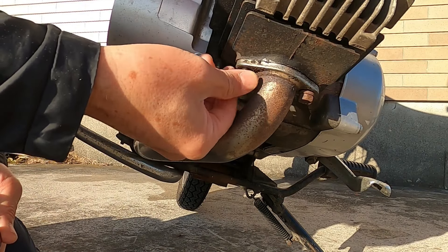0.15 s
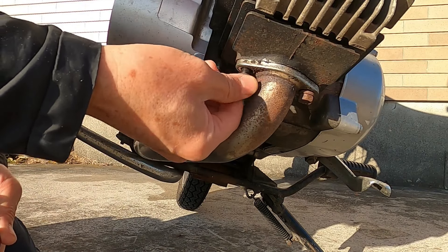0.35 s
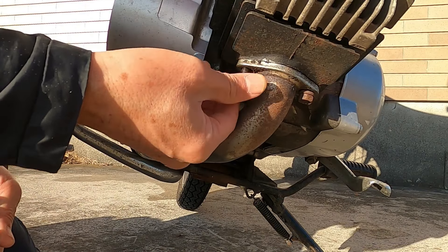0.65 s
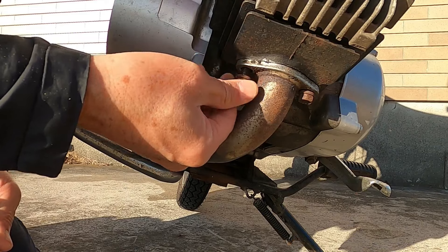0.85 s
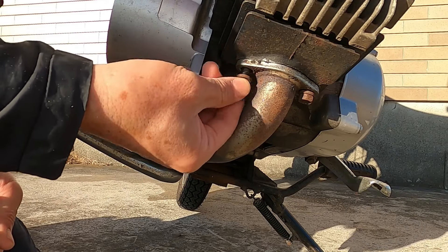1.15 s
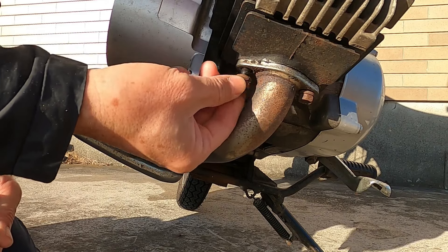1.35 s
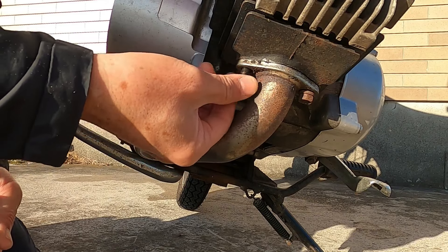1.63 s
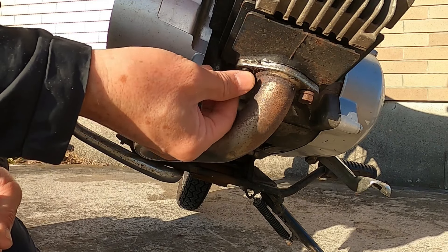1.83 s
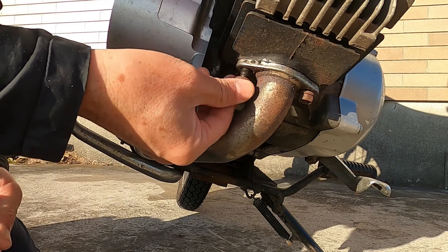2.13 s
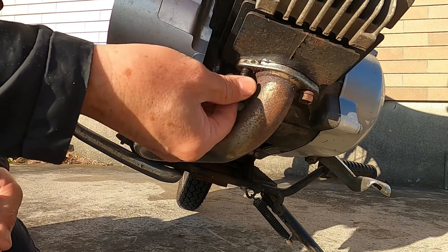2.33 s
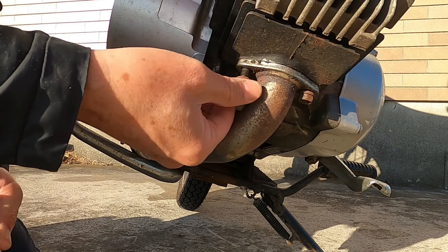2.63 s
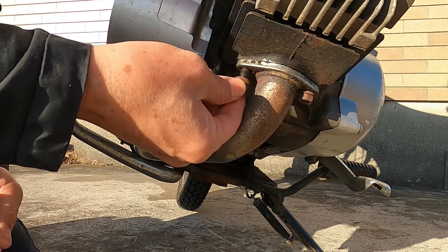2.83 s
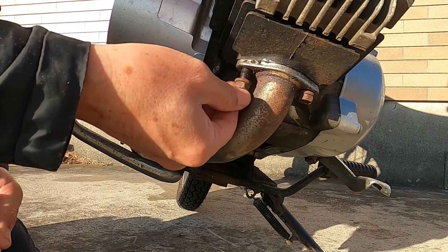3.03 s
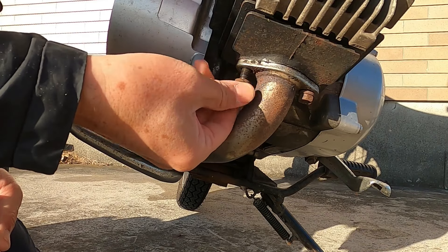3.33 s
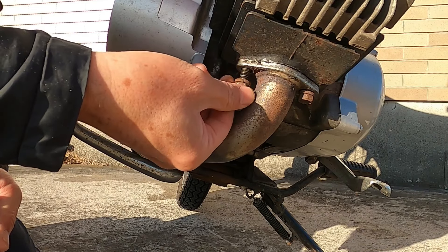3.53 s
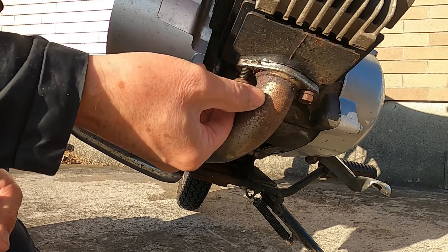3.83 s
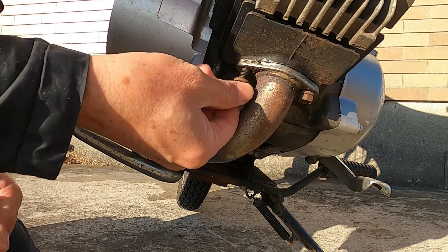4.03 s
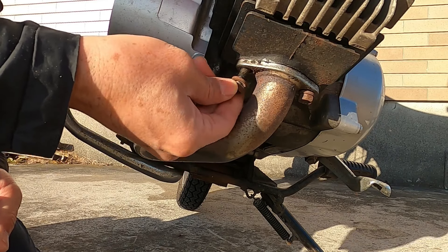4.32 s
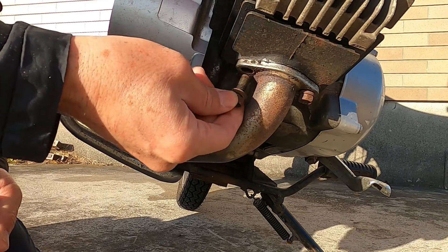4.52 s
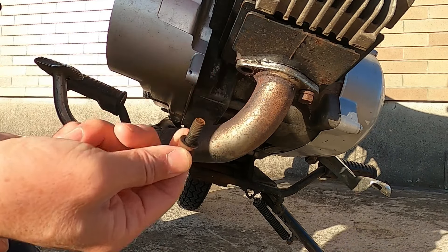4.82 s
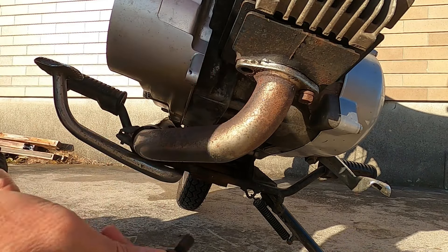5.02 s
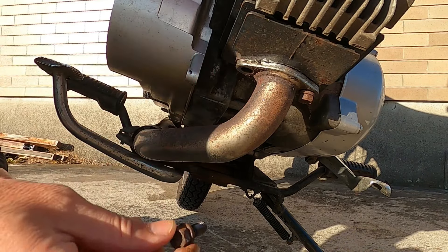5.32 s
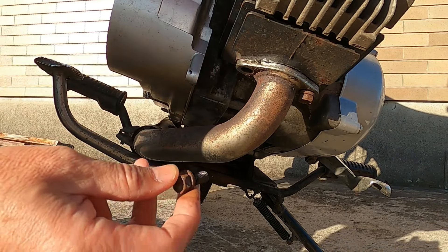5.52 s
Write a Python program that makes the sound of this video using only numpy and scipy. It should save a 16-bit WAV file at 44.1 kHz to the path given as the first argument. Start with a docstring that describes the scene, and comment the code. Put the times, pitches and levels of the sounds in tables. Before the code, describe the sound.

Close to the microphones, fingers turn a nut on an engine stud in short irregular twists, giving dry gritty rasps and faint metallic ticks. The sound is wide and smeared at first, then suddenly crisper, with bright clinks and one strongest knock near the end of the unscrewing. A nylon sleeve swishes as the hand withdraws. Outdoors, low wind thumps and a smooth distant town murmur continue.

```python
"""Loose nut on a small engine

Fingers spin a nut off a stud: scrapes, drag and blows of the thread excite resonances of finned iron.
Beside the ring lies a dry rasp of skin and rust. A nylon sleeve then swishes as shaped, gritty noise.
Light wind thumps the microphones as low noise in gusts, over the smooth noise of a distant town.
Until 3.33 s the stereo image is wide and blurred, its phase wandering; microphone hiss lies over all."""
import sys
import numpy as np
from scipy import signal
from scipy.fft import rfft, irfft, next_fast_len
from scipy.io import wavfile
from scipy.ndimage import uniform_filter1d

SR = 44100
rng = np.random.default_rng(int(sys.argv[2]) if len(sys.argv) > 2 else 0)


def wav_record(signal):
    """Record a signal, one row per channel, as 16-bit PCM in the file named by sys.argv[1]."""
    frames = np.transpose(np.atleast_2d(signal))
    bounded = np.clip(frames, -1, 1)
    # unit amplitude maps onto the largest positive 16-bit level
    quanta = np.round(bounded * 32767).astype(np.int16)
    wavfile.write(sys.argv[1], SR, quanta)


def invert_db(x):
    """Field ratio 10**(x/20) for x, a level in decibels (scalar or array-like)."""
    u = np.asarray(x, float) / 20
    return 10 ** u


N = 249769  # samples
PADDED = next_fast_len(N, True)  # transform length, samples
NUT_OFF_S = 4.69
BLUR_UNTIL_S = 3.33


def nut():
    """Source and resonator: contact forces of the thread drive the modes of the iron."""
    turning = drag()
    dry_rasp = rasp(turning)
    force = (scrapes() + turning) * grit(1.54) + blows()
    return dry_rasp + radiate(iron_ring(force))


# Thread scrapes: middle t/s, push level/dB, brightness/dB, side-on level/dB, length/s (at half height)
SCRAPES = [(0.02, -55, -1, -5, 0.006), (0.03, -44, 2, -20, 0.024), (0.0725, -51, 1, -11, 0.004),
           (0.1275, -44.5, -17, -26, 0.0073), (0.1666, -45, 3.5, -19, 0.014),
           (0.183, -44.5, -7, -20, 0.015), (0.212, -61, -1, -9, 0.02), (0.267, -34, -9.5, -13, 0.011),
           (0.3175, -42, 0.5, -6, 0.02), (0.337, -51, 12, -7, 0.012), (0.487, -50.5, 8.5, 5, 0.0075),
           (0.517, -49, -5, -4, 0.017), (0.5412, -56, 15, 9, 0.007), (0.659, -54, 1, 0, 0.025),
           (0.7373, -43, -6.5, -3, 0.01), (0.776, -48, 6.5, 2, 0.0059), (0.8413, -49, -7, -5, 0.012),
           (0.853, -50, -9, -10, 0.0093), (0.871, -46.5, -21, -28, 0.012), (0.887, -50, -22, -20, 0.017),
           (0.9045, -56, -10, -33, 0.02), (0.9253, -45, -13, -5, 0.0045), (1.068, -46, 2, 0.5, 0.03),
           (1.143, -51.5, -17, -10, 0.0077), (1.159, -58, -6, -18, 0.015), (1.185, -56.5, -8, -11, 0.0089),
           (1.2543, -44, -3, -19, 0.016), (1.4552, -37.5, -18, -18, 0.004),
           (1.5133, -49.5, 5.5, -7, 0.0084), (1.617, -49.5, -2, -12, 0.017), (1.642, -53.5, -1, -4, 0.014),
           (1.687, -56, -10, -9, 0.0097), (1.749, -50, -16, -25, 0.0048), (1.7998, -43.5, -5, 1, 0.024),
           (1.863, -56.5, -5, -1, 0.0092), (1.922, -49, -17, -13, 0.0059), (1.957, -63, 1, 5, 0.0081),
           (1.9705, -54.5, 11, 1, 0.02), (2.033, -57.5, -4.5, -2, 0.0093), (2.045, -54, -13, -15, 0.0067),
           (2.082, -51, -11, -1, 0.0085), (2.133, -49, -3.5, -6, 0.019), (2.1947, -55, 2.5, 0, 0.0099),
           (2.264, -45.5, -14, -19, 0.018), (2.3089, -47, 3.5, -5, 0.012), (2.375, -57.5, 4.5, 2, 0.0068),
           (2.423, -49, -10, -6, 0.0097), (2.476, -53, 5.5, 5, 0.02), (2.491, -54.5, 6, -4, 0.026),
           (2.525, -55, -12, -9, 0.033), (2.6832, -33.5, -5, -14, 0.007), (2.773, -57, -12, 0, 0.024),
           (2.853, -43.5, 10.5, 6.5, 0.0091), (2.887, -64.5, 13, -11, 0.012),
           (3.336, -51.5, -21, -27, 0.013), (3.36, -55.5, -25, -15, 0.032), (3.414, -64, 2, -18, 0.035),
           (3.439, -59, 0, -16, 0.0067), (3.463, -56, 2, -5, 0.0138), (3.478, -42, -27, -4, 0.0071),
           (3.504, -45, 5, -10, 0.0048), (3.5266, -48, -15, -3, 0.009), (3.606, -50, -1, 1.5, 0.0037),
           (3.651, -52, -10, -1, 0.0082), (3.79, -60.5, 1, 8.5, 0.031), (3.825, -58.5, 1, 8, 0.026),
           (3.8624, -52.5, -3, -4, 0.025), (3.93, -45.5, -8, -13, 0.0056), (4.078, -55.5, -26, -20, 0.022),
           (4.108, -56, -4, -9, 0.011), (4.134, -54, -7.5, -7, 0.013), (4.2105, -72.5, 9, -19, 0.019),
           (4.265, -42, -1, -18, 0.005), (4.289, -50, -7, -18, 0.014), (4.303, -47, -15.5, -21, 0.024),
           (4.484, -29, -44, -10, 0.0036), (4.528, -50, -15, -2, 0.0045), (4.603, -56, -17, -12, 0.025)]


def scrapes():
    """Brief friction: the force on each of four ring groups swells and dies, raggedly."""
    push = np.zeros((4, N))
    for middle, db, bright_db, side_db, length in SCRAPES:
        count = int(length * SR)
        start = int(middle * SR) - count
        # a shorter scrape pushes harder for the same ring
        shape = np.hanning(2 * count) * np.sqrt(1 + 0.0079 * SR / count)
        push[:, start:start + 2 * count] += ring_groups(db, bright_db, side_db)[:, None] * shape
    return push * walk(250, 2.8)


# Finger twists: start t/s, length/s, drag level/dB, brightness/dB (top ring group against the drag)
TWISTS = [(0.0, 0.088, -51.5, -6.5), (0.131, 0.12, -61.5, 1.5), (0.262, 0.067, -63.5, 4.5),
          (0.378, 0.027, -67, 12), (0.44, 0.11, -56, -11), (0.645, 0.06, -66.5, 5), (0.72, 0.094, -62, -1),
          (0.823, 0.13, -65, 5), (1.008, 0.13, -63.5, 2), (1.245, 0.086, -57.5, -6.5),
          (1.423, 0.054, -46, -6.5), (1.497, 0.068, -70, 3), (1.606, 0.11, -68, 6.5),
          (1.743, 0.16, -63.5, 1.5), (1.912, 0.13, -56, -6.5), (2.108, 0.11, -50, -6.5),
          (2.248, 0.09, -62.5, 5.5), (2.373, 0.021, -66.5, 9.5), (2.435, 0.11, -57, 0),
          (2.586, 0.085, -58, -8), (2.661, 0.11, -64, -2), (2.954, 0.12, -62, -6), (3.147, 0.052, -61, -6),
          (3.215, 0.024, -68, 14.5), (3.352, 0.1, -53, -1.5), (3.417, 0.12, -58, 0.5),
          (3.57, 0.12, -58.5, -24), (3.73, 0.21, -59, 0), (3.909, 0.076, -52, -8.5),
          (4.044, 0.11, -59.5, -0.5), (4.196, 0.028, -67.5, 9), (4.25, 0.095, -55.5, -10.5),
          (4.402, 0.06, -59, -2), (4.46, 0.103, -53.5, -9), (4.576, 0.088, -55.5, -8.5)]


def drag():
    """Stick-slip friction: the thread catches and slips at random through each twist."""
    rise_s, fall_s = 0.025, 0.023
    resting_db = -82.5  # fingers stay on the nut between twists
    push = invert_db(resting_db) * (np.arange(N) < NUT_OFF_S * SR)
    for start, length, db, bright_db in TWISTS:
        groups_db = db + np.array([-9, -16.5, -8.5, bright_db])
        push = push + invert_db(groups_db)[:, None] * stroke(start, length, rise_s, fall_s)
    return push * walk(70, 3.7)


# Clean metal blows, the nut dropping against the stud: t/s, push level/dB, brightness/dB, side-on level/dB
BLOWS = [(3.4755, -16, -4, -1), (3.5027, -20, 7, -3), (3.589, -26, -7, -3), (3.6494, -20.5, -9, -2),
         (3.9235, -15, -4, -13), (4.2605, -17.5, -2, -15), (4.476, -17.5, 3.5, -17), (4.4776, 3, -45, -32)]


def blows():
    """Impulse excitation: each blow is a push one sample long."""
    push = np.zeros((4, N))
    for s, db, bright_db, side_db in BLOWS:
        push[:, int(s * SR)] = ring_groups(db, bright_db, side_db)
    return push


def ring_groups(db, bright_db, side_db):
    """Modal excitation: the way of contact sets how hard each of the four ring groups is pushed."""
    third_db = 1.6 + 0.89 * bright_db
    fourth_db = 0.5 + 0.91 * bright_db
    return invert_db(db + np.array([0, side_db, third_db, fourth_db]))


# Modes of the iron, the short ones being the dense cooling-fin modes: f/Hz, level/dB, decay by 60 dB t/s
IRON = [(1457, -17.5, 0.11), (1827, -23.5, 0.11), (2101, 0.5, 0.08), (2140, -19.5, 0.072),
        (2236, -9.5, 0.057), (2334, -7.5, 0.11), (2684.4, 0, 0.11), (3030, -9, 0.0025), (2720, -29, 0.24),
        (3280, -11.5, 0.073), (3299, -10, 0.073), (3377, -3.5, 0.04), (3783, -7.5, 0.072),
        (3526, -7.5, 0.064), (3796, -10.5, 0.093), (4296, -7, 0.01), (4479, -5.5, 0.017),
        (4860, -13.5, 0.068), (5150, -16, 0.07), (5900, -21, 0.18), (5470, -10, 0.0034), (6100, -20, 0.068),
        (6210, -20, 0.05), (6610, -17.5, 0.024), (6770, -20, 0.0055), (7130, -18, 0.08),
        (7350, -38.5, 0.19), (8300, -16, 0.036), (9600, -40, .03)]
# Limits of the four ring groups: f/Hz
RING_EDGES_HZ = (1250, 2500, 2850, 3850, 12000)


def iron_ring(force):
    """Modal superposition: each mode, driven by its group's force, comes and goes as the contact wanders."""
    # each group mainly takes up the push near its own pitch
    for group, edges in enumerate(zip(RING_EDGES_HZ, RING_EDGES_HZ[1:])):
        b, a = signal.butter(N=1, Wn=edges, btype="band", fs=SR)
        force[group] = signal.lfilter(b, a, force[group])
    ring = np.zeros(N)
    split = int(BLUR_UNTIL_S * SR)
    for hz, db, t60 in IRON:
        group = np.searchsorted(RING_EDGES_HZ, hz) - 1
        drive = force[group] * walk(24.675, 2.0)
        # ringing stops at the split and starts afresh
        ring += np.r_[mode(drive[:split], hz, db, t60), mode(drive[split:], hz, db, t60)]
    return ring


def mode(drive, hz, db, t60):
    """Damped resonance: a two-pole filter, with db its rms level under steady white drive of rms 1."""
    pole = np.exp(2j * np.pi * hz / SR - np.log(1000) / (t60 * SR))
    gain = invert_db(db) * np.sqrt(2 * (1 - abs(pole) ** 2))
    return signal.lfilter([0, gain * pole.imag], [1, -2 * pole.real, abs(pole) ** 2], drive)


# How the engine block and microphones pass the ring on: f/Hz, level/dB
RADIATE = [(700, -6), (1300, -3.5), (1450, -4), (1720, -14), (1820, -5), (7300, -2), (8500, -15),
           (11000, -15), (15500, -22)]


def radiate(ring):
    """Radiation and path difference: the left microphone is a little further off and shaded in treble."""
    hz = np.fft.rfftfreq(PADDED, 1 / SR)
    delay_s = 0.00005
    left = invert_db(0.17 - hz / 1700) * np.exp(-2j * np.pi * hz * delay_s)
    ears = np.array([left, np.ones_like(hz)])
    return irfft(rfft(ring, PADDED) * invert_db(over_hz(RADIATE)) * ears, PADDED)[:, :N]


# Spectrum of the dry rasp of skin and rust: f/Hz, level/dB
RASP = [(1200, -24), (2500, -6.5), (4500, -2.5), (7200, -4), (8800, -14.5), (12000, -24.5), (15500, -37)]


def rasp(turning):
    """Friction noise: coloured noise follows the drag on the highest ring group."""
    level = invert_db(-10 + np.array([[-1.5], [1.5]]))  # left, right
    return colour(pair(0.4), RASP) * turning[-1] * level


# Sleeve strokes: start t/s, length/s, level/dB, swell/s, fade/s
SLEEVE = [(4.606, 0.1, -61, 0.033, 0.068), (4.74, 0.27, -51, 0.1, 0.31), (5.1, 0.18, -53.5, 0.12, 0.05),
          (5.316, 0.062, -57, 0.048, 0.03), (5.514, 0.081, -58, 0.13, 0.03)]
# Spectrum of rubbed nylon: f/Hz, level/dB
NYLON = [(1200, -13.5), (1900, -9.5), (3000, -6.5), (4600, -4), (6000, -9), (7300, -13.5), (9300, -31),
         (14000, -45.5)]


def sleeve():
    """Friction of rough surfaces: woven nylon slides on itself, a dense fine grit spread wide."""
    noise = pair(0.24)
    uneven = invert_db(1.8 * rng.exponential(size=N))
    rub = colour(noise * uneven, NYLON)
    level = invert_db(-65.5) * (np.arange(N) > NUT_OFF_S * SR)  # faint rub between strokes
    for start, length, db, swell, fade in SLEEVE:
        level = level + invert_db(db) * stroke(start, length, swell, fade)
    pan = invert_db(np.array([[2], [-2]]))  # left, right
    return rub * level * pan * walk(24, 0.94)


# Gusts on the microphones: t/s, rumble level/dB
GUSTS = [(0.0, -72), (0.05, -58.5), (0.31, -42), (0.38, -53), (0.63, -49.5), (0.71, -51), (0.91, -43),
         (1.06, -47), (1.58, -56), (1.67, -88), (1.84, -52), (2.16, -56.5), (2.22, -69), (2.33, -48),
         (2.4, -57), (2.73, -49.5), (2.81, -64), (3.58, -53), (3.66, -90.5), (3.7, -53), (4.46, -45),
         (4.49, -68), (4.56, -42.5), (4.78, -69), (4.82, -49), (4.92, -59.5), (5.09, -48), (5.25, -67.5),
         (5.31, -57), (5.66, -64.5)]
# Breeze under the gusts, freshening later on; lifts buffets and flutter: t/s, level/dB
BREEZE = [(0.0, 2), (0.6, 2.5), (1.5, 1.5), (2.3, 1), (3.2, 1.5), (3.45, 5.5), (4.3, 8), (5.0, 5.5),
          (5.66, 7)]
# Spectra of the three wind layers: f/Hz, level/dB
RUMBLE = [(9, -12), (15, 5), (45, 9.5), (62, -12.5), (100, -18), (300, -65), (900, -130)]
BUFFET = [(30, -28), (55, 2), (80, -6.5), (105, -5), (200, -46.5), (800, -130)]
FLUTTER = [(60, -24), (105, -2.5), (135, 10), (200, 0.5), (300, -19), (1200, -130)]


def wind():
    """Turbulent pressure: eddies thump the microphone ports; quicker buffets and flutter ride above."""
    gust_db, breeze_db = curve(GUSTS), curve(BREEZE)
    swing_db = gust_db - gust_db.mean()
    # the higher layers follow only a share of each gust
    buffet_db = -66 + 0.3 * swing_db + breeze_db
    flutter_db = -66.5 + 0.092 * swing_db + breeze_db
    gusts = wind_layer(gust_db, RUMBLE, 10, 2.2)
    gusts = gusts + wind_layer(buffet_db, BUFFET, 14, 3.8)
    gusts = gusts + wind_layer(flutter_db, FLUTTER, 20, 3.1)
    return gusts * invert_db(np.array([[0.6], [2.4]]))  # left, right


def wind_layer(level_db, tone, rate, spread_db):
    """Band of turbulence: coloured noise, nearly alike left and right, with a wandering level."""
    return colour(pair(0.95), tone) * invert_db(level_db) * walk(rate, spread_db)


# Distant town: t/s, level/dB
TOWN = [(0.0, -59), (0.91, -60.5), (1.83, -60.5), (2.36, -59.5), (2.92, -61), (3.18, -60.5), (3.56, -57),
        (4.29, -58), (5.0, -57.5), (5.66, -60)]
# Spectrum of the town: f/Hz, level/dB
TOWN_COLOUR = [(120, -25), (200, -3.5), (293, -3.5), (365, -1.5), (554, -5), (750, -9.5), (1000, -2),
               (1280, -2), (1560, -10), (2200, -19.5), (4000, -22.5), (7000, -26.5), (9000, -37),
               (15500, -82)]
# How alike left and right hear the town: f/Hz, correlation (0-1)
LIKENESS = [(200, 0.72), (1000, 0.74), (3000, 0.6), (10000, 0.5)]


def town():
    """Diffuse field: far traffic and yard air blend into smooth noise, breathing slightly."""
    air = colour(pair(over_hz(LIKENESS)), TOWN_COLOUR)
    level_db = curve(TOWN) + np.array([[-0.8], [0.8]])  # left, right
    return air * invert_db(level_db) * walk(3.3, 0.42)


# Spectrum of the microphone hiss: f/Hz, level/dB
HISS = [(1500, -34), (3000, -9), (7000, -2), (9000, -19), (12000, -18), (15500, -22)]


def hiss():
    """Self-noise: each microphone adds its own independent coloured noise."""
    return colour(pair(0), HISS) * invert_db(-78)


def curve(table):
    """Linear interpolation: a (t/s, value) table at every sample."""
    s, value = np.transpose(table)
    return np.interp(np.arange(N) / SR, s, value)


def unit(x):
    """Normalisation: scale to rms 1."""
    return x / np.sqrt(np.mean(x ** 2))


def over_hz(table):
    """Logarithmic pitch: a (f/Hz, value) table interpolated at every bin of the spectrum."""
    hz, value = np.transpose(table)
    return np.interp(np.log(np.fft.rfftfreq(PADDED, 1 / SR) + 1), np.log(hz), value)


def colour(x, table):
    """Linear filtering: weight x by a (f/Hz, level/dB) response and scale to rms 1."""
    return unit(irfft(rfft(x, PADDED) * invert_db(over_hz(table)), PADDED)[..., :N])


def pair(alike):
    """Interchannel correlation: left and right noise correlated by this much."""
    mid, side = rfft(rng.standard_normal((2, PADDED)))
    opposed = side * np.array([[1], [-1]])
    return irfft(np.sqrt(1 + alike) * mid + np.sqrt(1 - alike) * opposed, PADDED)[:, :N]


def walk(rate, spread_db):
    """Random modulation: a gain wanders between random levels, rate times a second."""
    count = int(N / SR * rate) + 2
    gains = invert_db(spread_db * rng.standard_normal(2000)[:count])
    return np.interp(np.arange(N) * rate / SR, np.arange(count), gains)


def grit(spread_db):
    """Asperity contact: noise in which a few contacts are much harder than the rest."""
    return unit(rng.standard_normal(N) * invert_db(spread_db * rng.exponential(size=N)))


def stroke(start, length, rise, fall):
    """Amplitude envelope: swell, hold and fade, 0-1, at every sample."""
    t = np.arange(N) / SR - start
    edge = np.clip(np.minimum(t / rise, (length - t) / fall) + 0.5, 0, 1)
    return np.sin(edge * np.pi / 2) ** 2


def scene():
    """Superposition: all sources add at the two microphones."""
    return nut() + sleeve() + wind() + town()


def phase_blur(x):
    """Phase decorrelation: early on, wandering phase per band widens the image and smears attacks."""
    half_turns, gain_db = 1.236, 2.0  # rms phase drift in half turns; early level lift
    _, s, z = signal.stft(x, SR, nperseg=1024, noverlap=768)
    early = s < BLUR_UNTIL_S
    drift = rng.standard_normal(z[..., early].shape)
    for axis, width in ((1, 9), (2, 7)):  # smooth over 9 bins and 7 frames, twice
        drift = uniform_filter1d(drift, width, axis=axis)
        drift = uniform_filter1d(drift, width, axis=axis)
    z[..., early] *= invert_db(gain_db) * np.exp(1j * np.pi * half_turns * unit(drift))
    return signal.istft(z, SR, nperseg=1024, noverlap=768)[1][:, :N]


def top_cut(x):
    """Nothing passes above the cut-off."""
    return signal.sosfilt(signal.butter(12, 15610, fs=SR, output="sos"), x)


def record(dry):
    """Signal chain: phase blur, then added microphone hiss, make the finished mix."""
    microphone_hiss = hiss()
    mix = phase_blur(dry) + microphone_hiss
    return top_cut(mix)


dry = scene()
out = record(dry)
wav_record(out)
```